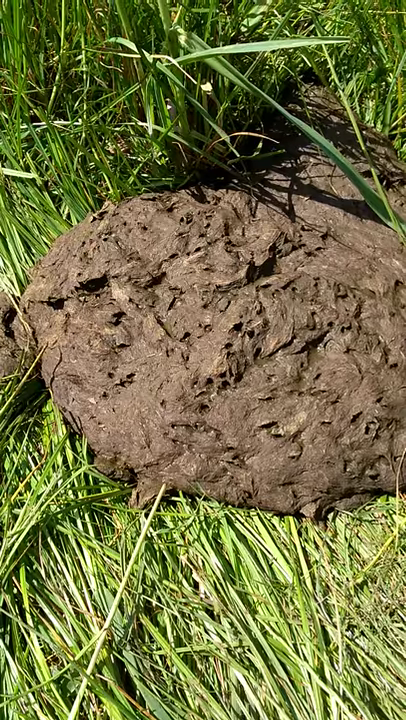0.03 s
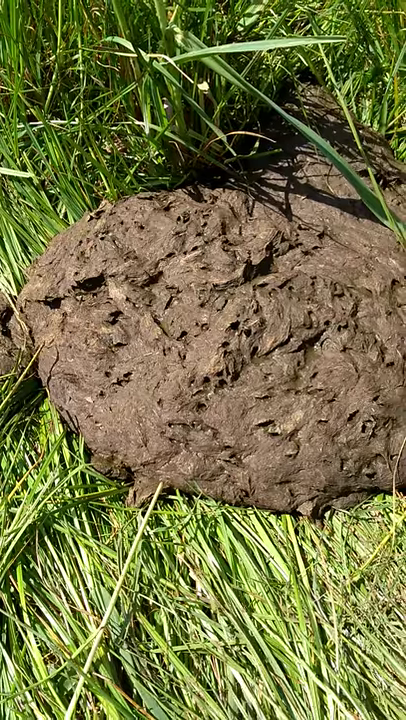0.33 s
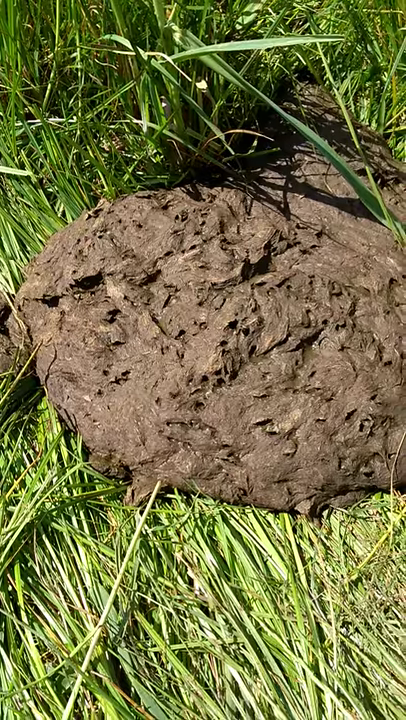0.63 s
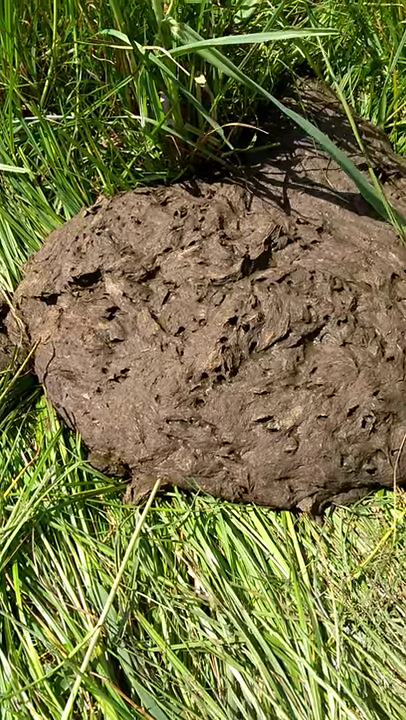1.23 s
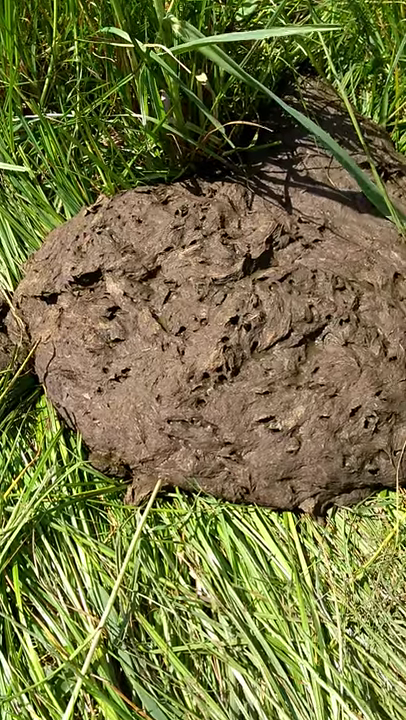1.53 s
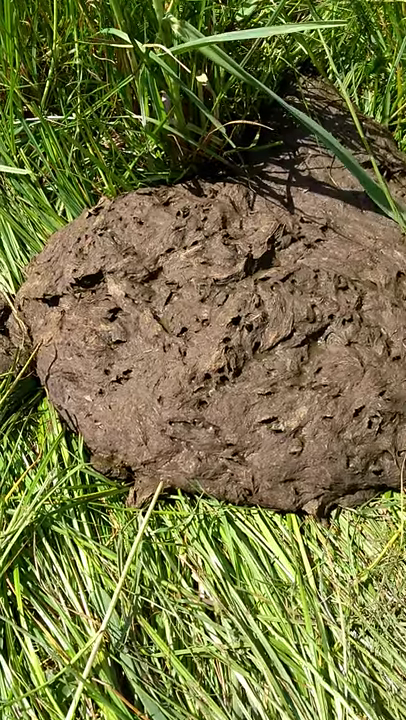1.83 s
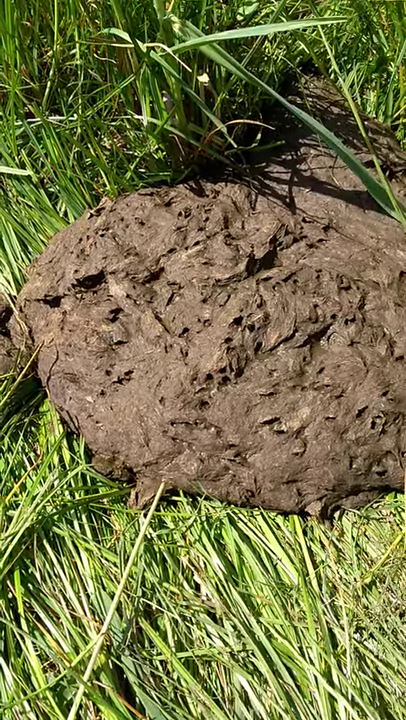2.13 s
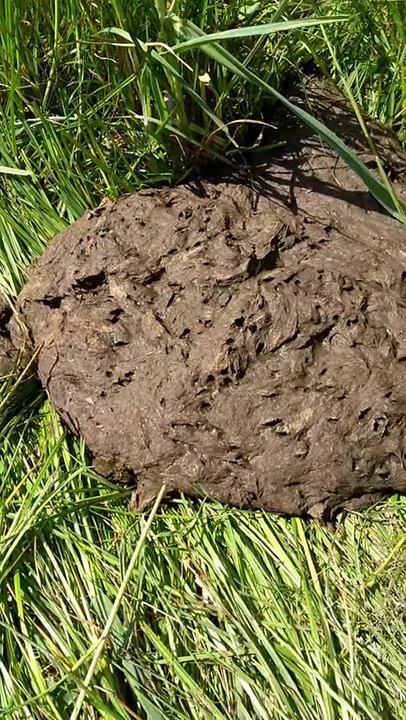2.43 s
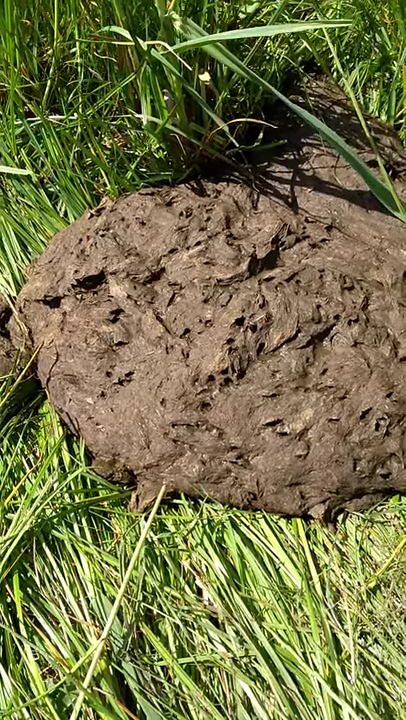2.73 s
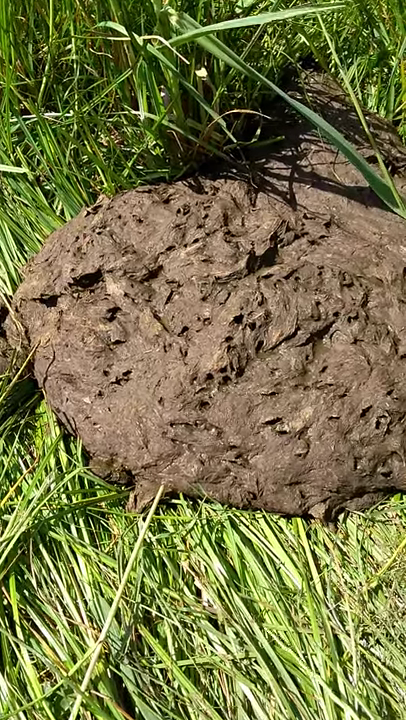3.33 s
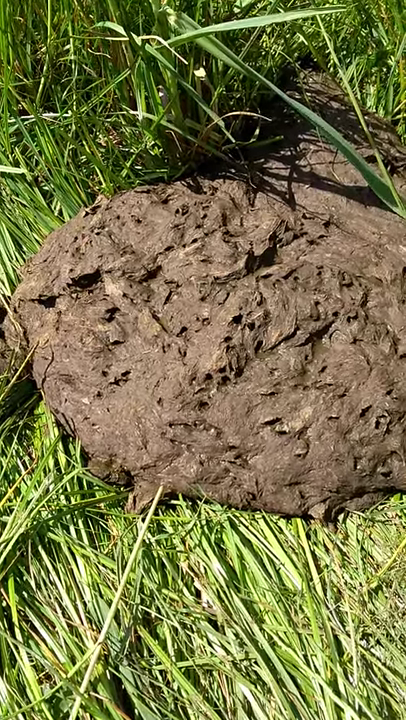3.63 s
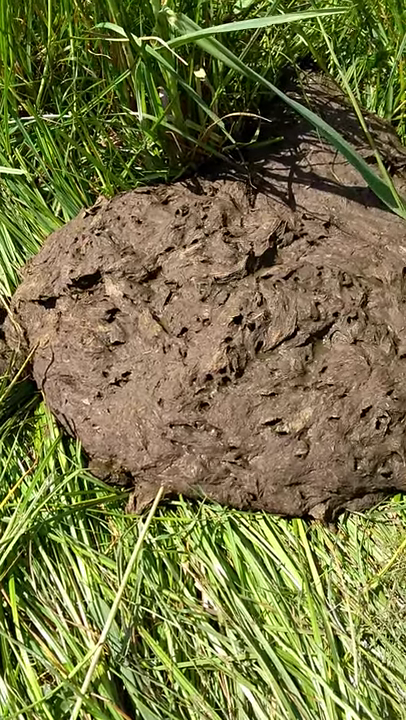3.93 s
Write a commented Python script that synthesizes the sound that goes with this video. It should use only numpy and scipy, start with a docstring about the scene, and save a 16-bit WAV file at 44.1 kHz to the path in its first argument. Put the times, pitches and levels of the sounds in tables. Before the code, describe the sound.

Wind rumbles and thumps unevenly on the microphone, with faint grass rustles behind it.

```python
"""Wind in an open field of tall grass. A steady far rush fades in, and a hollow note near 1 kHz
grows within it. Close by, blades of grass tick and swish, while gusts buffet the microphone with a low
flutter and a few hard bumps. From about 0.8 s, faint whistles come now and then from afar.
Near 2.8 s the hardest bump drives the limiter: the field ducks, then swells back under further gusts."""
import sys
import numpy as np
from scipy import signal
from scipy.fft import rfft, irfft
from scipy.io import wavfile
from scipy.ndimage import uniform_filter1d, minimum_filter1d

SR = 44100
rng = np.random.default_rng(int(sys.argv[2]) if len(sys.argv) > 2 else 0)


def wrap_up_sound(samples):
    """Save the sound to the file named by the first command line argument, as 16-bit audio."""
    columns = np.atleast_2d(samples).T
    # keep every value between -1 and 1, then stretch to whole-number steps
    tamed = np.clip(columns, -1, 1)
    steps = np.round(tamed * 32767).astype(np.int16)
    wavfile.write(sys.argv[1], SR, steps)


N = 176400
T, HZ = np.arange(N) / SR, np.fft.rfftfreq(N, 1 / SR)


def amp(db):
    """Decibels to gain."""
    return 10 ** (np.asarray(db) / 20)


def unit(x):
    """Scales to an rms of one."""
    return x / np.sqrt(np.mean(x ** 2) + 1e-20)


def eq_curve(points):
    """Joins (frequency, value) points across the spectrum on a log axis."""
    hz, value = np.transpose(points)
    return np.interp(np.log(HZ + 1), np.log(hz), value)


def hump(hz, octaves):
    """A broad spectral peak with soft skirts."""
    away = (np.log2((HZ + 1) / hz) / octaves) ** 2
    return 1 / (1 + away + away ** 2)


def swell(centre_s, half_s):
    """A bell-shaped rise and fall in level."""
    return np.exp(-.5 * ((T - centre_s) / half_s) ** 2)


def drift(hz):
    """Smooth random modulation up to about the given rate, with an rms of one."""
    return unit(irfft(rfft(rng.standard_normal(N)) * np.exp(-(HZ / hz) ** 2), N))


def stereo_noise(spectrum):
    """Noise of a given spectrum, nearly mono in the mids, wide in the treble, with a few narrow dips."""
    # stereo width, side against mid (frequency [Hz], level [dB])
    side_levels = [(500, -45), (1400, -57), (2700, -42), (3400, -58.5), (4500, 1), (5600, -12.5),
                   (6800, -3.5), (9000, -6.5), (13000, -9)]
    # dips in the microphone's response (centre [Hz], width [Hz], depth [dB])
    dips = [(2291, 270, 12), (4585, 300, 6), (6710, 480, 6), (13200, 400, 4)]
    mid, side = rfft(rng.standard_normal((2, N)))
    side = side * amp(eq_curve(side_levels))
    response = amp(-sum(db * np.exp(-((HZ - hz) / width) ** 2) for hz, width, db in dips))
    return unit(irfft(np.array([mid + side, mid - side]) * spectrum * response, N))


def far_rush(crossover_hz=3800):
    """The bed: distant wind over the field, its body and its hiss wavering separately."""
    # tone colour of the rush (frequency [Hz], relative level [dB])
    colour = [(25, 0), (70, 10), (200, 2.5), (450, -1), (650, 0), (800, -0.5), (1100, 3), (1500, -2),
              (1900, -10), (2700, -14), (3600, -12), (4400, -22), (5600, -18), (7500, -23), (10000, -27),
              (12000, -29), (14200, -29.5)]
    # level ride of the whole rush (time [s], level [dB])
    ride = [(.08, -61.5), (.2, -50.5), (.8, -43.5), (1.2, -47), (1.55, -48), (1.9, -46), (2.7, -43.5),
            (3.2, -44.5), (3.6, -44), (4, -40.5)]
    # extra ride on the hiss alone (time [s], gain [dB])
    hiss_ride = [(.1, -0.5), (.8, -1), (1.3, 1), (1.8, 2), (2.7, -1.5), (3.2, -2), (4, -4)]
    noise = stereo_noise(amp(eq_curve(colour)))
    body = irfft(rfft(noise) / (1 + (HZ / crossover_hz) ** 4), N)
    hiss = (noise - body) * amp(np.interp(T, *np.transpose(hiss_ride)) + 0.43 * drift(53))
    return (body * amp(1.36 * drift(19.5)) + hiss) * amp(np.interp(T, *np.transpose(ride)))


def hollow_note(width_hz=123, waver_db=2.65):
    """A narrow band of noise in the rush that slowly grows louder and sinks in pitch."""
    # path of the note (time [s], pitch [Hz], level [dB])
    path = [(.06, 1140, -115), (.25, 1140, -71), (0.802, 1130, -55), (1.498, 1080, -59), (2.3, 1090, -52),
            (2.801, 1090, -55.5), (3.352, 1070, -55.5), (3.65, 1020, -47), (4, 1060, -51)]
    s, hz, db = np.transpose(path)
    band = irfft(rfft(rng.standard_normal((2, N))) / (1 + (2 * HZ / width_hz) ** 2), N)
    phase = 2 * np.pi * np.cumsum(np.interp(T, s, hz)) / SR
    note = unit(band[0] * np.cos(phase) + band[1] * np.sin(phase))
    return note * amp(np.interp(T, s, db) + waver_db * drift(13))


def grass(grain_db=2, tick_decay_s=0.0047):
    """Blades slide over each other in grainy swishes, and now and then one ticks."""
    # sliding blades (centre time [s], half length [s], level [dB], centre [Hz], width [octaves])
    swishes = [(0.85, 0.15, -59, 2940, 0.54), (0.92, 0.024, -54, 5670, 0.42),
               (1.788, 0.085, -66, 5700, 0.49), (2.024, .027, -51.5, 5270, 0.38)]
    # ticking blades (time [s], level [dB], centre [Hz])
    ticks = [(.161, -60, 5500), (.609, -51, 6700), (1.195, -59, 7000), (1.364, -54, 3200),
             (1.456, -51, 6200), (1.7915, -59, 5500), (2.471, -59, 9000)]
    out = np.zeros((2, N))
    for s, half, db, hz, octaves in swishes:
        friction = stereo_noise(hump(hz, octaves))
        grain = unit(amp(grain_db * drift(140)))
        out += friction * grain * amp(db) * swell(s, half)
    for s, db, hz in ticks:
        decay = (T >= s) * np.exp(-abs(T - s) / tick_decay_s)
        out += stereo_noise(hump(hz, octaves=.6)) * amp(db) * decay
    return out


def bumps():
    """Single eddies hit the port, each one push and pull of pressure with a small overshoot."""
    # eddy hits (time [s], peak [dB], time scale [ms])
    hits = [(0.2657, -33, 0.26), (.324, -28.5, 0.24), (0.3623, -22, 0.74), (1.1357, -14, 0.56),
            (1.2896, -15.5, 0.69), (1.334, -18.5, 0.55), (1.359, -16, 0.82), (1.366, -16.5, 0.49),
            (1.744, -22, 1), (2.7684, -10.5, 0.72), (2.781, -1.5, 0.41), (2.806, -14, .8), (2.813, -13, 1),
            (2.899, -18.5, 0.9), (2.9676, -13, 0.59), (3.0067, -13.5, 0.59), (3.5392, -24.5, 0.65)]
    out = np.zeros(N)
    for s, db, ms in hits:
        age = (T - s) * 1000 / ms
        push = -np.sin(0.85 * age) / (1 + (age / 2) ** 2) ** 1.9
        out += amp(db) * push / push.max()
    return out


def flutter(corner_hz, top_slope=3.73, low_slope=2.24, band_count=17):
    """Eddy noise at the port, spanning from 0.4 of a moving corner frequency up to that corner."""
    centres = np.geomspace(25, 4000, band_count)
    noise = rfft(rng.standard_normal(N))
    eddies = np.zeros(N)
    for hz, solo in zip(centres, np.eye(band_count)):
        band = irfft(noise * eq_curve(list(zip(centres, solo))), N)
        top_cut = np.sqrt(1 + (hz / corner_hz) ** (2 * top_slope))
        low_cut = np.sqrt(1 + (0.4 * corner_hz / hz) ** (2 * low_slope))
        eddies += band / top_cut / low_cut
    eddies = unit(eddies)
    # 4:1 levelling over a 50 ms window keeps the eddies of one gust about equally strong
    window = signal.windows.hann(int(0.05 * SR))
    local_power = abs(signal.fftconvolve(eddies ** 2, window / window.sum(), "same")) + 1e-9
    return eddies / local_power ** 0.375


def buffeting(rise_s=0.0065, fall_s=0.0083, breeze_db=-49.5, puff_db=3, puffs_per_s=36):
    """Turbulence at the port: gusts over a light breeze, each coming apart into ragged puffs."""
    # gusts on the microphone (start [s], length [s], level [dB])
    gusts = [(0.316, 0.072, -30), (0.396, 0.1, -35), (0.62, 0.0089, -42.5), (.675, 0.022, -46),
             (0.941, 0.023, -42.5), (1.009, 0.013, -40), (1.115, 0.036, -27), (1.177, 0.01, -28),
             (1.202, 0.039, -30), (1.274, 0.029, -26), (1.309, 0.0074, -27), (1.333, 0.04, -28),
             (1.374, 0.097, -36), (1.518, 0.027, -30.5), (1.579, 0.084, -35), (1.686, 0.037, -33),
             (1.737, 0.035, -33.5), (1.771, 0.024, -30.5), (1.824, 0.053, -41), (1.896, 0.024, -38.5),
             (2.055, .016, -41), (2.309, 0.0076, -42), (2.574, 0.062, -36.5), (2.678, 0.064, -33.5),
             (2.758, 0.027, -21), (2.797, 0.015, -11.5), (2.82, 0.041, -26.5), (2.879, .05, -25.5),
             (2.957, 0.015, -24), (2.989, 0.013, -20.5), (3.186, 0.27, -41), (3.274, 0.016, -35),
             (3.514, 0.046, -33.5), (3.806, 0.02, -30), (3.839, .02, -32.5), (3.925, 0.073, -36)]
    breeze = amp(breeze_db + 3.5 * drift(12)) * np.clip(T / 1.2, 1e-3, 1) ** 2
    power = breeze ** 2
    for start, length, db in gusts:
        attack = np.clip((T - start) / rise_s + .5, 0, 1)
        release = np.exp(-np.maximum(T - start - length, 0) / fall_s)
        power += (amp(db) * attack * release) ** 2
    # stronger wind makes smaller, faster eddies: 281 Hz at -11 dB, an octave up per 52 dB
    wind_db = 10 * np.log10(power)
    eddies = flutter(corner_hz=281 * 2 ** ((wind_db + 11) / 52))
    puff_rate = puffs_per_s * (1 + 0.4025 * drift(30.15))
    puffs = np.sin(2 * np.pi * np.cumsum(puff_rate) / SR)
    return np.sqrt(power) * unit(amp(puff_db * puffs) * eddies)


def boom(wind, hz=339, q=2.8, mix=0.33):
    """A broad low resonance that colours the wind at the port."""
    return wind + mix * signal.lfilter(*signal.iirpeak(hz, q, fs=SR), wind)


def whistles(wander_hz=60.5):
    """Thin wavering notes from far away, barely above the rush."""
    # far whistles (centre time [s], half length [s], level [dB], pitch [Hz])
    notes = [(0.816, .06, -59.5, 2657), (0.863, 0.19, -66, 2930), (2.045, 0.018, -57.5, 3660),
             (2.97, .06, -61, 2660)]
    out = np.zeros(N)
    for s, half, db, hz in notes:
        phase = 2 * np.pi * np.cumsum(hz + wander_hz * drift(54)) / SR
        out += amp(db) * swell(s, half) * np.sqrt(2) * np.sin(phase)
    return out


def limiter(x, ceiling_db=-7, release_db_per_s=11.5, lookahead_s=0.0013):
    """Ducks both channels just ahead of a peak and lets them swell back slowly."""
    over_db = np.maximum(20 * np.log10(abs(x).max(0) + 1e-9) - ceiling_db, 0)
    recovery = T * release_db_per_s
    held_db = np.maximum.accumulate(over_db + recovery) - recovery
    span = 2 * (int(lookahead_s * SR) + 1)
    return x * amp(uniform_filter1d(minimum_filter1d(-held_db, span), span))


def scene():
    """Wind on the microphone up front, the field behind it, the grass nearby."""
    return boom(buffeting() + bumps()) + far_rush() + hollow_note() + grass() + whistles()


def record(dry, bass_cut_hz=54, open_s=0.076, fade_in_s=0.024, top_hz=14300):
    """Two slightly unlike ports, then a bass cut, a fade-in, the limiter and a steep top cut."""
    # balance of the ports (frequency [Hz], left minus right [dB])
    balance = [(25, -6), (64, -2.6), (125, -.3), (350, 1.1), (850, 0), (2800, 0), (4500, -1.8), (7000, 0),
               (13000, -.7)]
    # phase between the ports (frequency [Hz], left lead [rad])
    lead = [(20, 1.5), (43, 1.27), (96, .8), (190, .45), (390, .19), (520, .12), (850, 0)]
    left = amp(eq_curve(balance) / 2) * np.exp(.5j * eq_curve(lead))
    x = irfft(rfft(dry) * np.array([left, 1 / left]), N)
    x = signal.sosfilt(signal.butter(2, bass_cut_hz, "highpass", fs=SR, output="sos"), x)
    x = x * np.clip((T - open_s) / fade_in_s, 0, 1)
    top_cut = signal.firwin(511, top_hz, window=("kaiser", 9), fs=SR)
    return signal.oaconvolve(limiter(x), top_cut[None], "same")


dry = scene()
out = record(dry)
wrap_up_sound(out)
```